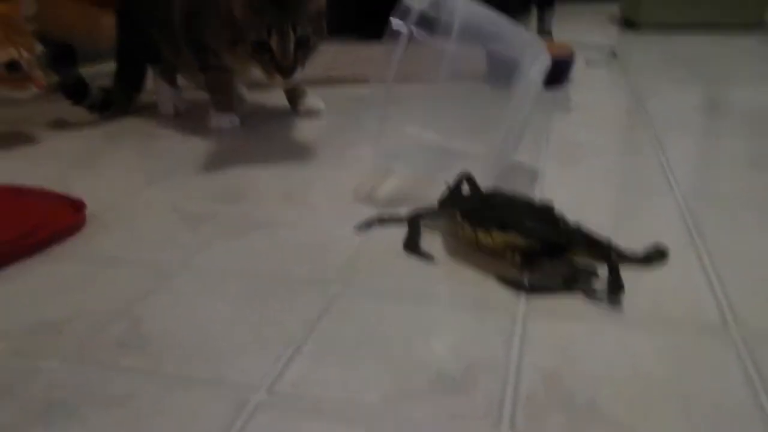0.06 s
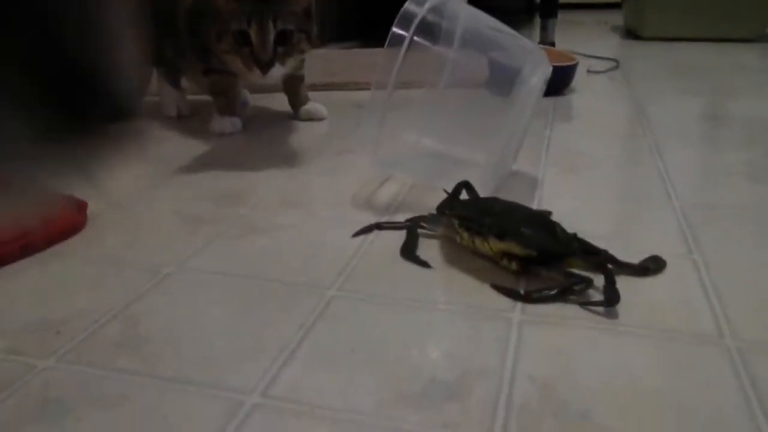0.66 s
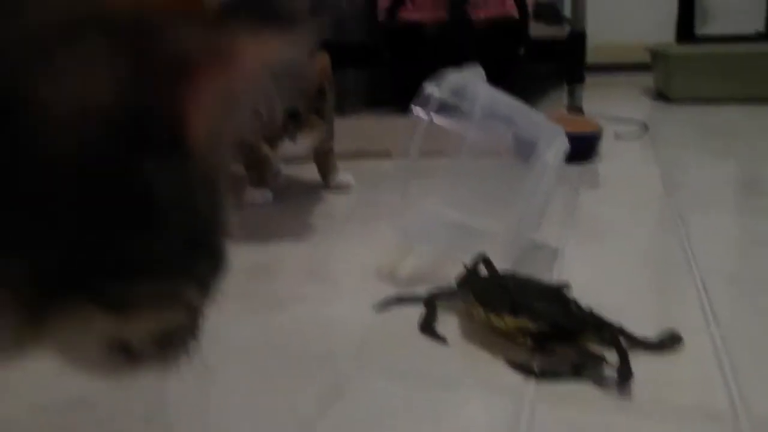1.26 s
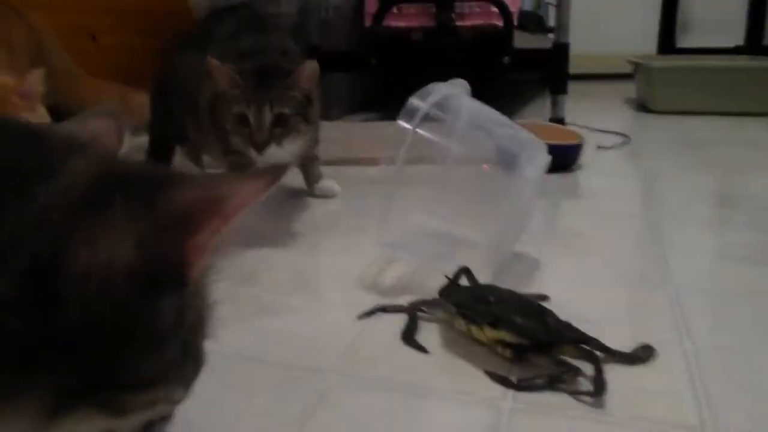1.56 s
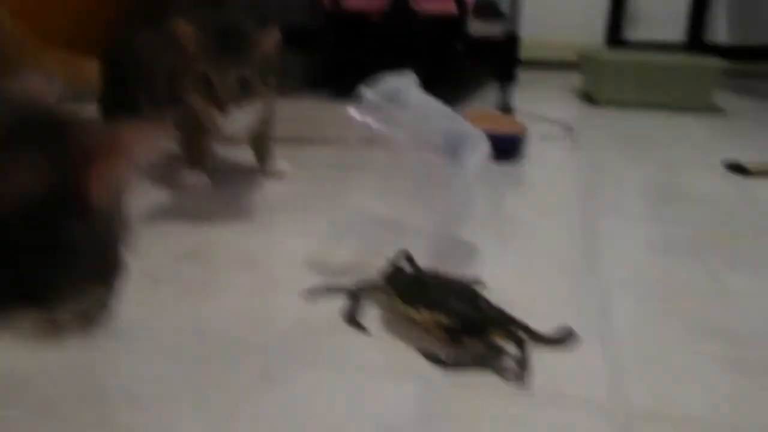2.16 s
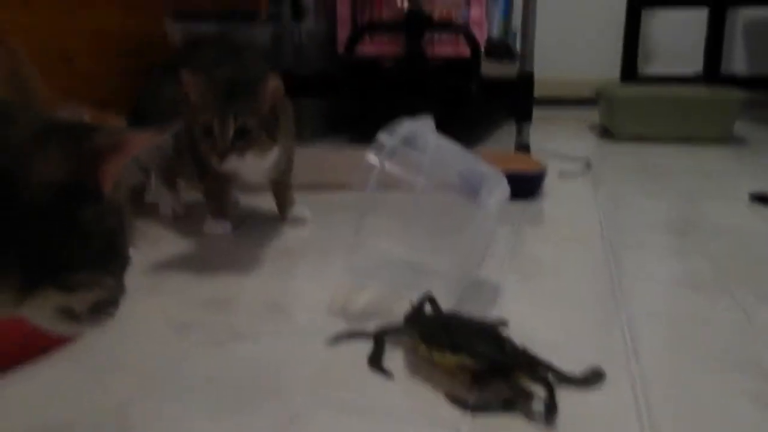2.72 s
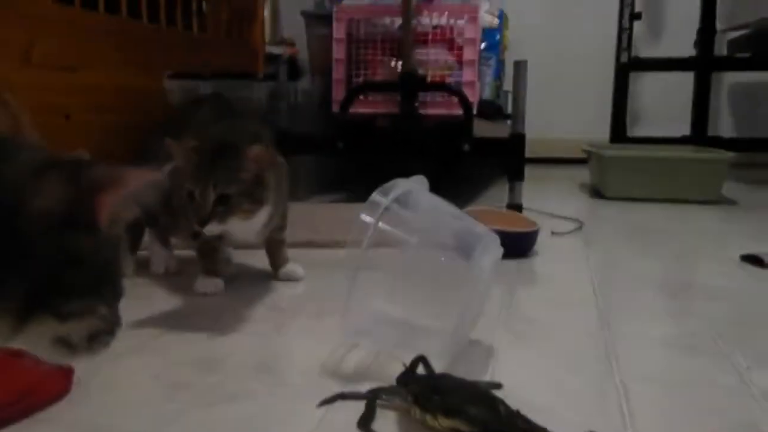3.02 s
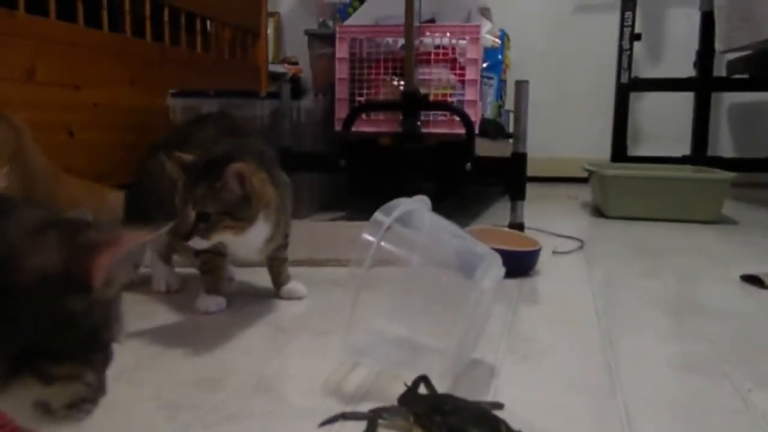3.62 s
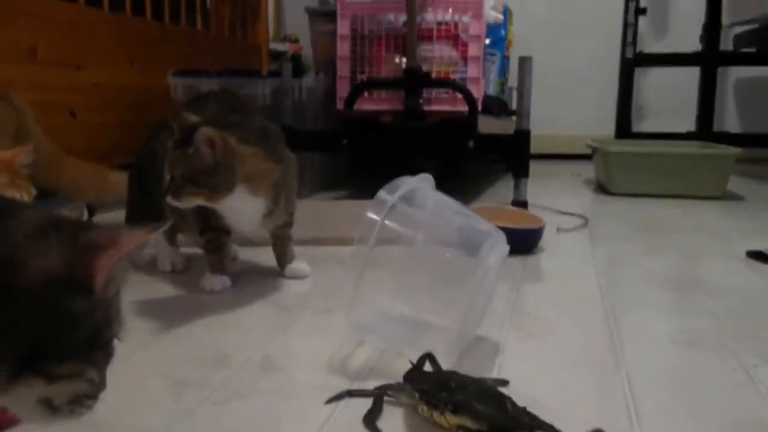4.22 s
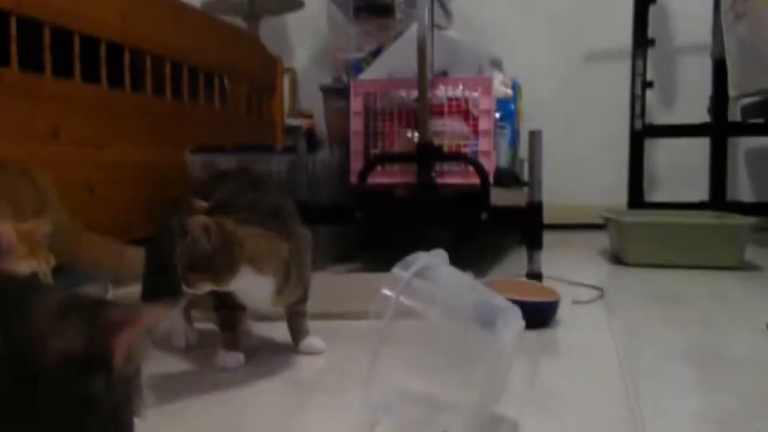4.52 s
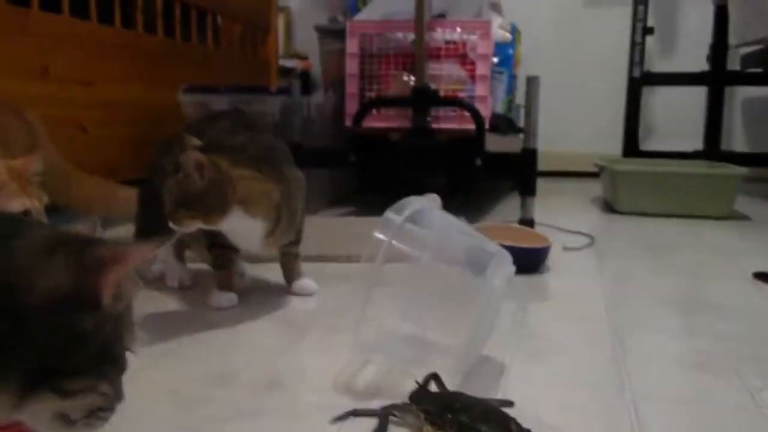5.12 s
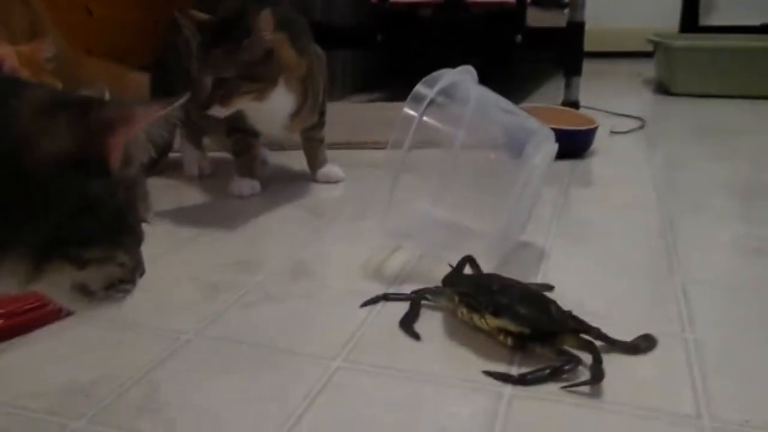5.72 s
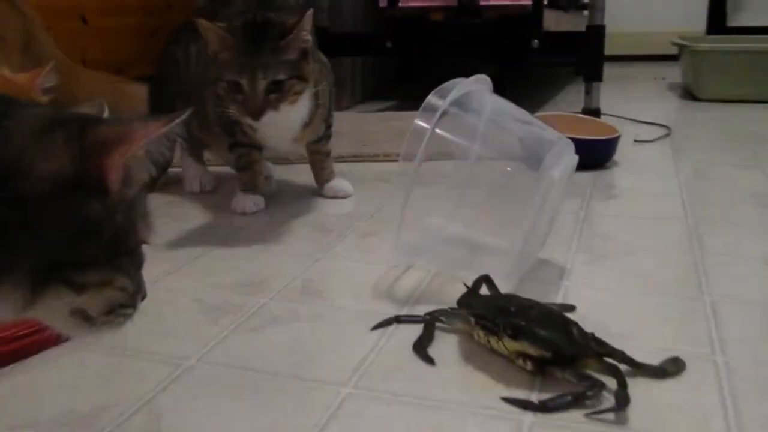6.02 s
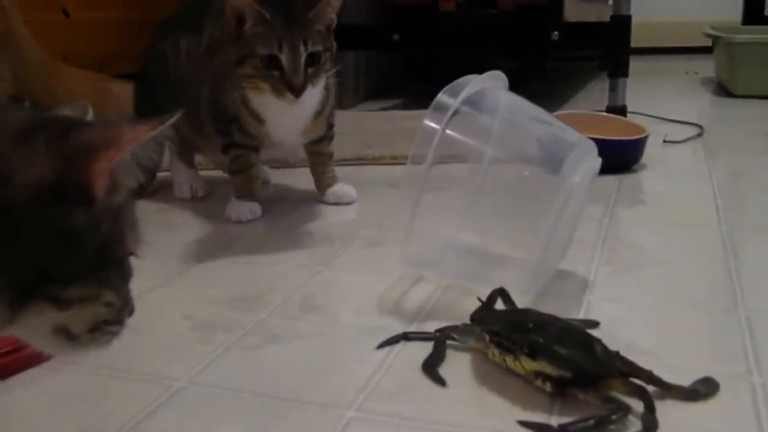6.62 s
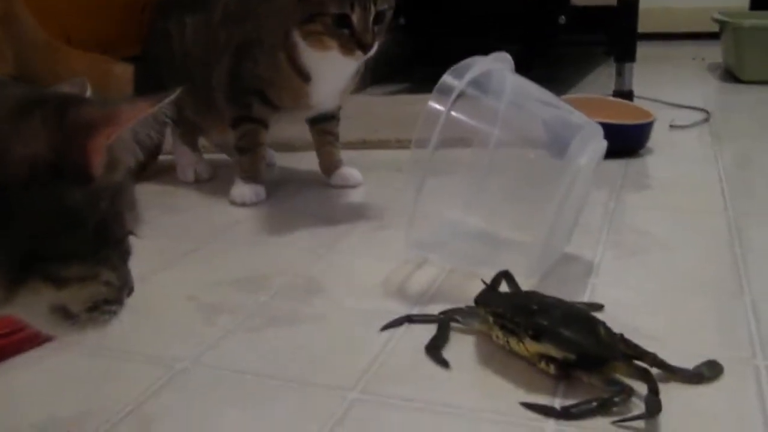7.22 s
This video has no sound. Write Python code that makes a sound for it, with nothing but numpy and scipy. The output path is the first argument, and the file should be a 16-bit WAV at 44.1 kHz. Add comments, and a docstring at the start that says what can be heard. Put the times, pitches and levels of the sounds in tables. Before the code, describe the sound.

A crab's legs tick lightly and unevenly on a tiled floor in a quiet kitchen. Right at the microphone, a hand rubs, squeaks and knocks on a small camera, busiest in the first three seconds. After a few soft thumps, a zoom lever snaps sharply and the lens gears whir for about a second, with one knock partway through. Faint claw taps continue to the end.

```python
"""Crab on a kitchen floor

A crab's claws tick on tile: each impact rings the hollow leg and draws a soft thud from the floor.
Close by, a hand shifts on a small camera: friction makes the skin rub, groan and squeak, and impacts
make the case knock and thump. Then the zoom lever snaps and the lens gears whir for a second.
The sound is band-limited, with a mirror image of the treble just above the band edge."""
import sys
import numpy as np
from scipy import signal
from scipy.fft import rfft, irfft, next_fast_len
from scipy.io import wavfile
from scipy.ndimage import uniform_filter1d, minimum_filter1d

SR = 44100
rng = np.random.default_rng(int(sys.argv[2]) if len(sys.argv) > 2 else 0)


def transcribe(u):
    """Save the signal u as a 16-bit wav file named by the first command-line argument.

    u: samples, shape (n,) or (channels, n), limited to [-1, 1]; the rate is SR.
    q: integer samples, one column per channel.
    """
    v = np.clip(np.atleast_2d(u).T, -1, 1)
    q = np.round(v * 32767).astype(np.int16)
    wavfile.write(sys.argv[1], SR, q)


N = 320333
TIME = np.arange(N) / SR
CAMERA_RATE_HZ, BAND_EDGE_HZ = 16000, 7720


def claws(skid_s=.0016, tick_t60=.024, ring_width_hz=1200, ring_db=4, thud_hz=280, thud_t60=.045):
    """Impact excitation: a hard tip skids on tile, the hollow leg resonates and the floor thuds."""
    # clearest steps: t/s, relative level/dB, shell resonance f/Hz
    steps = [(0.402, -29, 6400), (1.4655, -18.5, 6500), (2.1672, -28, 3400), (2.44, -35, 4530),
             (2.852, -31, 1500), (2.921, -28, 1700), (3.1043, -30, 4430), (3.12, -35.5, 6000),
             (3.142, -38, 1500), (3.2455, -36, 4440), (3.291, -37.5, 5170), (3.3705, -38.5, 2330),
             (4.3527, -33, 5250), (4.8925, -34, 1280), (4.970, -39, 4600), (5.213, -40.5, 4770),
             (5.269, -41, 1300), (6.67, -40, 1300), (6.78, -45, 900), (6.874, -38, 900), (7.076, -45, 1000),
             (7.164, -44, 3600), (7.209, -38.5, 2250)]
    out, t = np.zeros(N), TIME[:SR // 16]
    skid = np.minimum(t / skid_s, 1) * from_db(-60 * np.maximum(t - skid_s, 0) / tick_t60)
    thud = cut(ring(signal.unit_impulse(len(t)), thud_hz, thud_t60), thud_hz / 2, "high")
    grits = rng.standard_normal((64, len(t)))
    for (s, db, hz), grit in zip(steps + light_steps(), grits):
        force = cut(grit * skid, 350, "high")
        force = cut(force, 2.2 * hz, "low", order=1)   # blunt, low-ringing steps are duller
        leg = from_db(ring_db) * resonate(force, hz, ring_width_hz)
        tick = cut(force + leg, BAND_EDGE_HZ, "low", order=4)
        tick *= np.sqrt(np.sum(skid ** 2) / np.sum(tick ** 2))
        add(out, s, from_db(db - 8) * tick)
        add(out, s, from_db(min(db - 4, -42.5)) * thud)   # grows with the step, up to a ceiling
    return out


def light_steps(per_s=3, db=-48, spread_db=2, hz=1800, spread_octaves=.7):
    """A random point process: the other legs patter, as rows of t/s, relative level/dB, f/Hz."""
    gaps, strengths, pitches = rng.uniform(-1, 1, (40, 3)).T
    times = np.cumsum(1 + gaps) / per_s
    rows = zip(times, db + spread_db * strengths, hz * 2 ** (spread_octaves * pitches))
    return [row for row in rows if row[0] < TIME[-1]]


def rubbing(grain_db=1.05, flutter_db=.8, regrip_s=3.3, palm_delay_s=.000801, palm_echo=.28):
    """Friction noise: tiny slips of skin excite the case; the cupped palm acts as a comb filter."""
    # spectra of the camera's hollow shell, the dry rub and the fine hiss: f/Hz, relative density/dB
    shell_spectrum = [(100, -19.5), (280, -9), (520, -4.5), (800, 1.5), (1050, -8), (1320, -2), (1600, -8),
                      (1900, -15), (2600, -31)]
    rub_spectrum = [(1400, -22.5), (1850, -9.5), (2250, -4.5), (2800, -10), (3100, -6.5), (3450, -7.5),
                    (4200, -1), (4650, -2), (5200, -3.5), (5700, -6), (6100, -8), (7500, -24.5)]
    hiss_spectrum = [(4800, -19.5), (5600, -0.5), (6200, 3), (6700, 3.5), (7200, 1), (7800, -13.5)]
    # resonances near the lens barrel: f/Hz, bandwidth/Hz, relative level/dB
    resonances = [(2150, 190, -2), (3130, 420, -6), (4680, 450, -1.5), (5700, 340, -8.5), (6980, 400, -4)]
    spectra = shell_spectrum, rub_spectrum, hiss_spectrum
    slips_db = grain_db * drift(500)
    shell, rub, hiss = (noise(spectrum) * gain * from_db(slips_db + flutter_db * drift(45))
                        for spectrum, gain in zip(spectra, stroke_gains()))
    skin = rub + hiss
    barrel = sum(from_db(db + 5.4) * resonate(skin, hz, width) for hz, width, db in resonances)
    near_barrel = from_db(-9.5) * skin + barrel
    sound = shell + np.where(TIME < regrip_s, skin, near_barrel)
    delay = palm_delay_s * np.exp(.14 * drift(3))   # the gap between palm and case keeps changing
    return sound + palm_echo * np.interp(TIME - delay, TIME, sound)


def stroke_gains(attack_s=.034, release_s=.033, swell_db=5.6, calm_db_per_s=1.1, still_s=5.35):
    """Incoherent sources add in power: strokes and the resting hand set shell, rub and hiss gains."""
    # strokes of skin: start t/s, duration/s, place of hardest press (0-1), shell, rub, hiss level/dB
    strokes = [(0.0, 0.044, 0.25, -41.5, -46.5, -48.0), (0.112, 0.095, 0.95, -49.5, -47.5, -51.5),
               (0.419, 0.028, 0.95, -64.5, -56.5, -51.0), (0.476, 0.048, 0.46, -56.5, -41.5, -44.0),
               (0.727, 0.175, 0.7, -42.0, -42.5, -48.5), (0.915, 0.052, 0.11, -42.0, -38.5, -44.0),
               (0.972, 0.098, 0.71, -43.5, -50.5, -56.0), (1.083, 0.045, 0.84, -42.5, -34.0, -30.0),
               (1.132, 0.074, 0.71, -54.5, -55.0, -58.0), (1.245, 0.086, 0.05, -43.5, -41.5, -40.0),
               (1.41, 0.068, 0.57, -41.5, -39.5, -38.5), (1.507, 0.119, 0.63, -37.5, -34.5, -32.5),
               (1.626, 0.171, 0.84, -41.5, -31.5, -31.0), (1.812, 0.174, 0.61, -42.5, -38.0, -40.0),
               (1.981, 0.149, 0.62, -38.5, -35.5, -34.5), (2.201, 0.069, 0.73, -46.5, -47.0, -49.5),
               (2.285, 0.117, 0.14, -52.5, -49.5, -54.0), (2.457, 0.056, 0.05, -48.5, -49.5, -58.0),
               (2.566, 0.089, 0.62, -49.0, -42.0, -48.0), (2.716, 0.088, 0.41, -43.5, -46.0, -54.5),
               (2.834, 0.041, 0.7, -39.5, -43.0, -50.5), (2.928, 0.062, 0.66, -49.5, -51.0, -56.5),
               (3.034, 0.03, 0.34, -50.5, -47.0, -59.0), (3.508, 0.027, 0.58, -50.5, -53.0, -58.0),
               (3.875, 0.244, 0.81, -58.5, -63.0, -68.5), (4.129, 0.047, 0.41, -61.0, -43.5, -45.0),
               (4.19, 0.2, 0.6, -55, -53.5, -57), (4.25, 0.035, 0.5, -58, -50.5, -50.5),
               (4.448, 0.064, 0.57, -60.5, -56.5, -60.5), (4.587, 0.08, 0.9, -59.5, -50.5, -51.0),
               (4.904, 0.045, 0.39, -64.5, -52.5, -63.5), (5.24, 0.07, 0.6, -61, -61.5, -62.5),
               (6.806, 0.099, 0.84, -65.0, -62.5, -63.5)]
    # hand resting on the case at the start: shell, rub, hiss level/dB
    rest_db = [-63, -66, -72]
    t = TIME[::44]
    resting = from_db(-calm_db_per_s * t) * np.clip((still_s - t) / .05, 0, 1)
    power = np.outer(from_db(rest_db), resting) ** 2
    for s, length, crest, shell_db, rub_db, hiss_db in strokes:
        fade_db = 20 * (np.maximum(s - t, 0) / attack_s + np.maximum(t - s - length, 0) / release_s)
        press_db = swell_db * np.interp((t - s) / length, [0, crest, 1], [-1, 0, -1])
        # the shell answers even a light touch, so it rises and falls more slowly
        levels_db = np.array([shell_db - fade_db / 2.2, rub_db - fade_db, hiss_db - fade_db])
        power += from_db(press_db + levels_db) ** 2
    return [np.interp(TIME, t, np.sqrt(layer)) for layer in power]


def groans():
    """Narrow-band resonance: a dragging finger shudders and feeds one note of the case."""
    # drags: centre t/s, duration/s, f/Hz, bandwidth per stage/Hz, level/dB
    drags = [(0.999, 0.15, 490, 204, -50), (1.262, 0.047, 928, 200, -41), (1.436, .02, 844, 90, -31),
             (2.06, .16, 1350, 300, -47), (2.8, .24, 1300, 250, -52.5), (4.0, .2, 1390, 250, -65),
             (3.717, 0.43, 135, 130, -56), (4.284, 0.16, 817, 120, -53.5), (4.929, 0.074, 2400, 300, -56)]
    out = np.zeros(N)
    for s, length, hz, width_hz, db in drags:
        swell = signal.windows.hann(round(length * SR)) ** .5
        note = narrow_band(rng.standard_normal(len(swell)), hz, width_hz)
        add(out, s - length / 2, from_db(db) * swell * note)
    return out


def squeaks(jitter=.018, octave_db=-4.5, rasp_db=3.5):
    """Stick-slip oscillation: skin whistles at a pitch that glides with the finger's speed."""
    # glides: start t/s, duration/s, first, middle and last f/Hz, level/dB
    glides = [(.024, 0.022, 3630, 3450, 3130, -53), (0.109, 0.048, 3200, 2850, 2980, -57),
              (0.342, 0.027, 6900, 7600, 6800, -59), (0.432, 0.04, 5100, 5000, 5300, -48),
              (0.502, .046, 4980, 4300, 3850, -44.5)]
    out = np.zeros(N)
    for s, length, first, middle, last, db in glides:
        progress = np.linspace(0, 1, round(length * SR))
        hz = np.polyval(np.polyfit([0, .5, 1], [first, middle, last], 2), progress)
        hz *= 1 + jitter * drift(900)[:len(hz)]
        phase = 2 * np.pi * np.cumsum(hz) / SR
        swell = np.sqrt(2 * np.abs(np.sin(np.pi * progress)))
        grip = swell * from_db(db + rasp_db * drift(704)[:len(hz)])
        add(out, s, grip * (np.sin(phase) + from_db(octave_db) * np.sin(2 * phase)))
    return out


def knocks(scuff_db=-25, scuff_t60=.016):
    """Modal response: a finger scuffs and rings the case; softer contact excites fewer high modes."""
    # finger impacts: t/s, relative level/dB, hardness as cut-off f/Hz
    impacts = [(0.0509, -16.5, 2850), (1.428, -16.5, 1200), (1.467, -27, 2000), (4.708, -33, 7000),
               (4.7525, -26, 390), (6.1017, -12.4, 3150)]
    # modes of the case: f/Hz, relative level/dB, T60/s
    case_modes = [(383, -18.5, 0.051), (566, -18, 0.063), (812, -6, 0.044), (1036, -22, .13),
                  (1096, -6, 0.026), (1295, 0.5, 0.016), (1600, -3.5, 0.016), (2080, -9, 0.022),
                  (2840, -13, 0.017), (4450, -4.5, .009), (5760, -8, 0.014), (6950, -6, .008)]
    out, t = np.zeros(N), TIME[:SR // 5]
    for s, db, hard_hz in impacts:
        push = cut(signal.unit_impulse(len(t)), hard_hz, "low", order=1)
        push = cut(push, 1.8 * hard_hz, "low", order=1)
        scuff = cut(rng.standard_normal(len(t)), hard_hz, "low")
        scuff *= from_db(scuff_db - 60 * t / scuff_t60)
        add(out, s, from_db(db) * (ring_modes(push, case_modes) + scuff))
    return out


def bumps(t60_cycles=4.1, soft_hz=900):
    """Damped oscillation: the palm's soft push rocks the camera, or a step thuds the floor, for a few cycles."""
    # pushes of the palm, and at 2.44 s the floor thud under a crab step: t/s, level/dB, f/Hz
    pushes = [(0.361, -36, 254), (0.828, -24.5, 160), (1.549, -20.5, 218), (2.44, -38, 280),
              (2.746, -36, 290), (4.312, -30, 206), (4.354, -36.5, 127), (4.754, -19, 205),
              (4.82, -29.5, 170), (5.394, -32, 330)]
    out, push = np.zeros(N), cut(signal.unit_impulse(SR // 8), soft_hz, "low")
    for s, db, hz in pushes:
        add(out, s, from_db(db) * ring(push, hz, t60_cycles / hz))
    return out


def lever(rattle_db=-35, rattle_t60=.07):
    """Impact: the sprung lever hits its stop in a quick run of clicks, the barrel rings and loose parts buzz."""
    # snap, a quick run of clicks: t/s, relative level/dB
    impacts = [(5.3118, -10.5), (5.3122, -2), (5.3133, -13.5)]
    # modes of lever and lens barrel: f/Hz, relative level/dB, T60/s
    barrel_modes = [(400, -39, .12), (605, -31, 0.05), (883, -24, 0.026), (1060, -37.5, .16),
                    (1430, -8.5, 0.024), (2200, -11, 0.016), (2665, -9, 0.0054), (3740, 0, 0.007),
                    (4365, 0.5, 0.01), (5190, 4.5, 0.0038), (6290, -6.5, 0.0096), (7030, -4.5, 0.0081),
                    (3450, -40, .2), (3530, -47, 0.11), (6060, -43.5, 0.16)]
    out, clicks, t = np.zeros(N), np.zeros(SR // 2), TIME[:SR // 2]
    start_s = impacts[0][0]
    for s, db in impacts:
        add(clicks, s - start_s, from_db([db]))
    rattle = cut(rng.standard_normal(len(t)), 300, "high") * from_db(rattle_db - 60 * t / rattle_t60)
    add(out, start_s, rattle + ring_modes(clicks, barrel_modes))
    return out


def zoom_motor(on_s=5.385, off_s=6.425, ramp_s=.0058, turn_hz=22.7, grain_db=3.5):
    """Amplitude modulation: gear rattle throbs with each turn of two wheels, over the motor's hum."""
    # gear resonances: f/Hz, half-bandwidth per stage/Hz, relative level/dB, modulation depth (0-1)
    gears = [(2310, 180, 1.5, .12), (4310, 420, 3, 0.1), (5510, 430, 1.5, .1), (6640, 550, 4, 0.5),
             (3220, 1000, -1.5, 0.06)]
    # motor hum: f/Hz, relative density/dB
    hum_spectrum = [(60, -50), (130, 1), (230, -4), (400, -25), (900, -12), (1500, -12.5), (3000, -20)]
    running = np.clip(np.minimum(TIME - on_s, off_s - TIME) / ramp_s, 0, 1)
    angle = 2 * np.pi * np.cumsum(turn_hz * (1 + .0094 * drift(3.47))) / SR
    throb = np.cos(angle) + .28 * np.cos(angle / 2)   # the second wheel turns at half speed
    whir = 0
    for hz, half_width_hz, db, depth in gears:
        teeth = rng.standard_normal(N) * from_db(grain_db * drift(600))
        whir += from_db(db) * narrow_band(teeth, hz, 2 * half_width_hz) * (1 + depth * throb)
    hum = from_db(-6) * noise(hum_spectrum)
    return from_db(-53) * running * (whir / 2 + hum)


def kitchen(x, t60=.32, wall_hz=5000, gap_s=.004):
    """Reverberation: dense, dull reflections decay exponentially."""
    t = TIME[:SR // 2]
    tail = cut(rng.standard_normal(len(t)), wall_hz, "low") * from_db(-60 * t / t60) * (t > gap_s)
    return signal.fftconvolve(x, tail / np.sqrt(np.sum(tail ** 2)))[:N]


def room_tone(level_db=-56.9):
    """Stationary noise: the room's faint background, strongest in the bass."""
    # background: f/Hz, relative density/dB
    spectrum = [(24, -53.5), (40, -25.5), (95, -14), (120, -7.5), (197, -9.5), (273, -5.5), (371, -9.5),
                (462, -10), (538, -12.5), (575, -11.5), (929, -15.5), (1060, -14.5), (1260, -18),
                (2280, -21.5), (7400, -25.5), (9620, -58), (16300, -120)]
    return from_db(level_db) * noise(spectrum)


def from_db(db):
    """Level to amplitude ratio."""
    return 10 ** (np.asarray(db) / 20)


def rms_one(x):
    """Normalisation to unit rms."""
    return x / np.sqrt(np.mean(x ** 2) + 1e-20)


def cut(x, hz, kind, order=2):
    """Butterworth low- or high-pass."""
    return signal.sosfilt(signal.butter(order, hz, kind, fs=SR, output="sos"), x + 1e-18)


def drift(rate_hz):
    """Random fluctuation of unit rms, interpolated between Gaussian values."""
    knots = rng.standard_normal(8000)
    return rms_one(np.interp(TIME * rate_hz, np.arange(len(knots)), knots))


def noise(spectrum):
    """Spectral shaping: unit-rms noise below the camera's Nyquist frequency."""
    hz, db = np.transpose(spectrum)
    size = next_fast_len(N)
    bins = np.maximum(np.fft.rfftfreq(size, 1 / SR), 1)
    gain = from_db(np.interp(np.log(bins), np.log(hz), db)) * (bins < CAMERA_RATE_HZ / 2)
    return rms_one(irfft(rfft(rng.standard_normal(size)) * gain, size)[:N])


def ring(x, hz, t60):
    """Damped oscillator: a unit impulse starts a sine of amplitude 1."""
    r, w = from_db(-60 / (t60 * SR)), 2 * np.pi * hz / SR
    return signal.lfilter([0, np.sin(w)], [1, -2 * r * np.cos(w), r * r], x + 1e-18)


def ring_modes(force, modes):
    """Modal superposition, with alternating polarity."""
    return sum((-1) ** k * from_db(db) * ring(force, hz, t60) for k, (hz, db, t60) in enumerate(modes))


def resonate(x, hz, width_hz):
    """Two-pole resonance with unit peak gain."""
    r, w = np.exp(-np.pi * width_hz / SR), 2 * np.pi * hz / SR
    return signal.lfilter(np.array([1, 0, -1]) * (1 - r * r) / 2, [1, -2 * r * np.cos(w), r * r], x)


def narrow_band(x, hz, width_hz):
    """Two equal resonances in cascade, scaled to unit rms."""
    return rms_one(resonate(resonate(x, hz, width_hz), hz, width_hz))


def add(track, s, sound):
    """Superposition: mix a sound into the track at time s."""
    at = round(s * SR)
    track[at:at + len(sound)] += sound[:N - at]


def limiter(x, ceiling, size):
    """Peak limiting: the gain dips around peaks that pass the ceiling."""
    allowed = ceiling / np.maximum(np.abs(x), ceiling)
    return x * uniform_filter1d(minimum_filter1d(allowed, size), size)


def scene():
    """Direct and reverberant fields: the crab is out in the room, the handling close and nearly dry."""
    crab, taps, snap = claws(), knocks() + bumps(), lever()
    reflections = kitchen(from_db(-16.5) * crab + from_db(-28) * taps + from_db(-33.5) * snap)
    background = room_tone()
    handling = cut(taps + rubbing() + groans() + squeaks() + snap, 99, "high", order=3)
    return (crab + handling + reflections + zoom_motor() + background)[None]


def record(dry, image_db=-10, cutoff_hz=17100):
    """Spectral imaging: the camera's low sample rate mirrors the treble; peaks are limited and rounded."""
    band = signal.sosfilt(signal.cheby1(12, .3, BAND_EDGE_HZ, fs=SR, output="sos"), dry)
    image = cut(2 * band * np.cos(2 * np.pi * CAMERA_RATE_HZ * TIME), 8950, "low", order=22)
    rounded = np.tanh(limiter(band + from_db(image_db) * image, ceiling=.98, size=11))
    return signal.sosfilt(signal.cheby2(16, 60, cutoff_hz, fs=SR, output="sos"), rounded)


dry = scene()
out = record(dry)
transcribe(out)
```